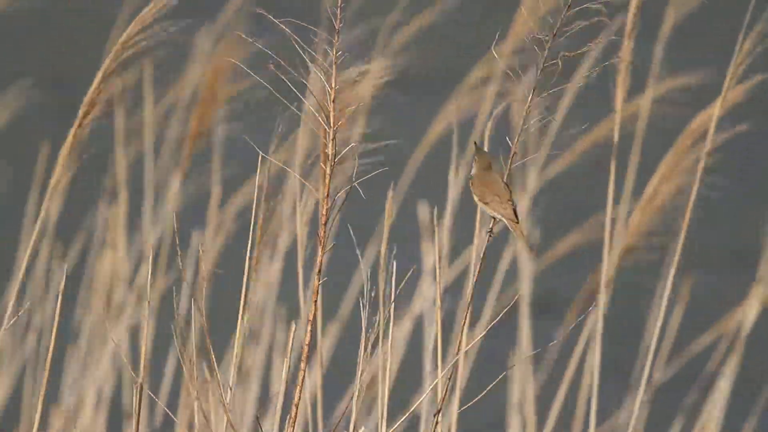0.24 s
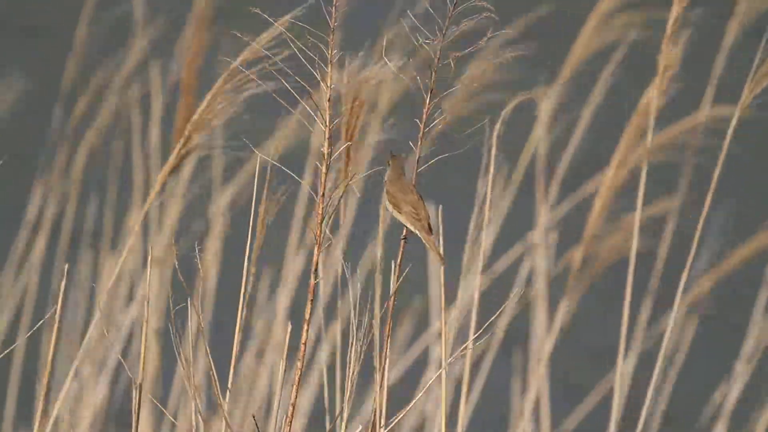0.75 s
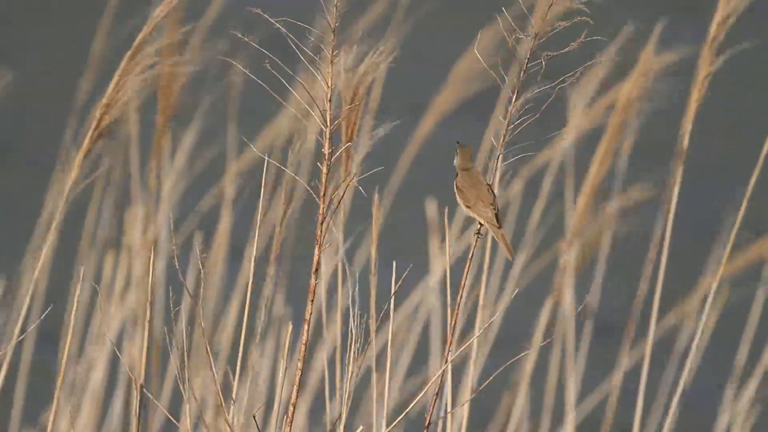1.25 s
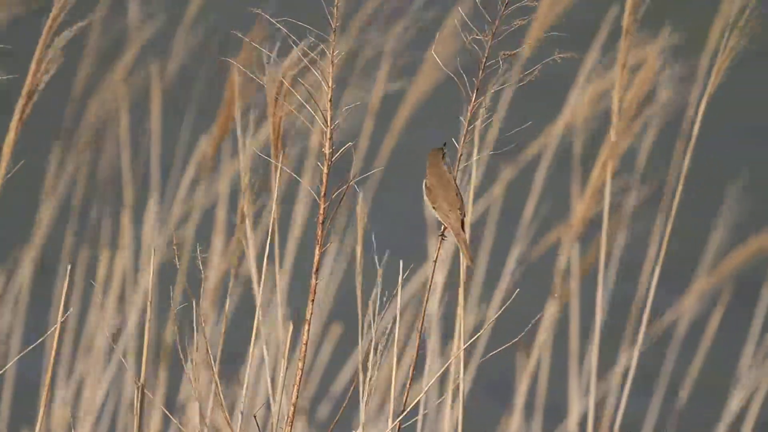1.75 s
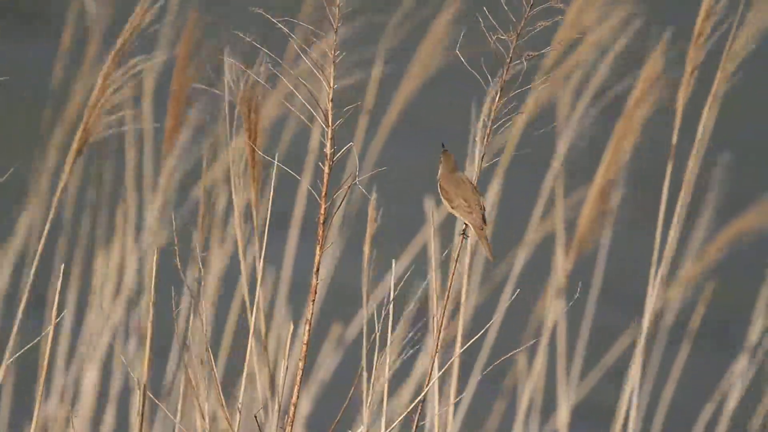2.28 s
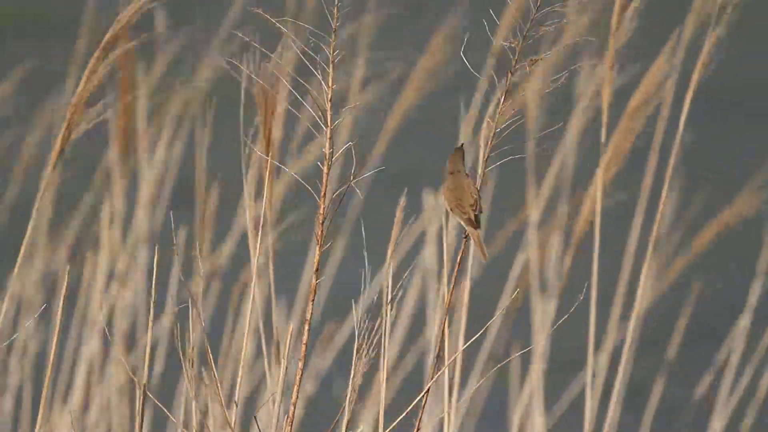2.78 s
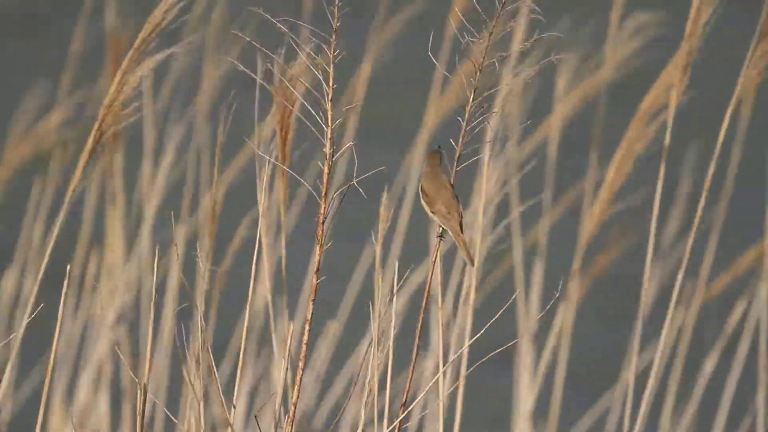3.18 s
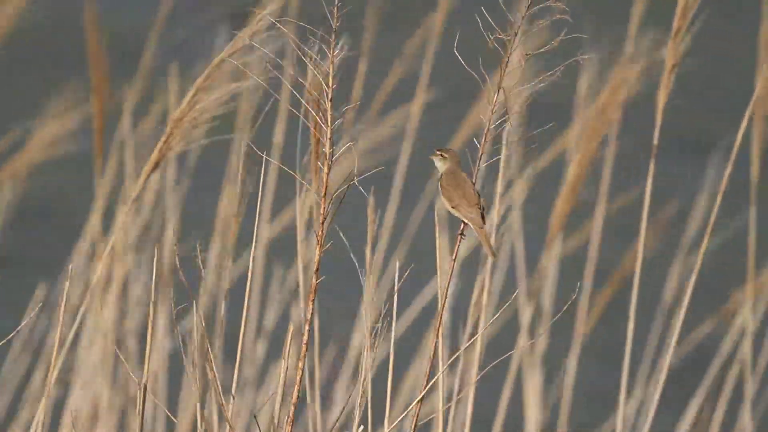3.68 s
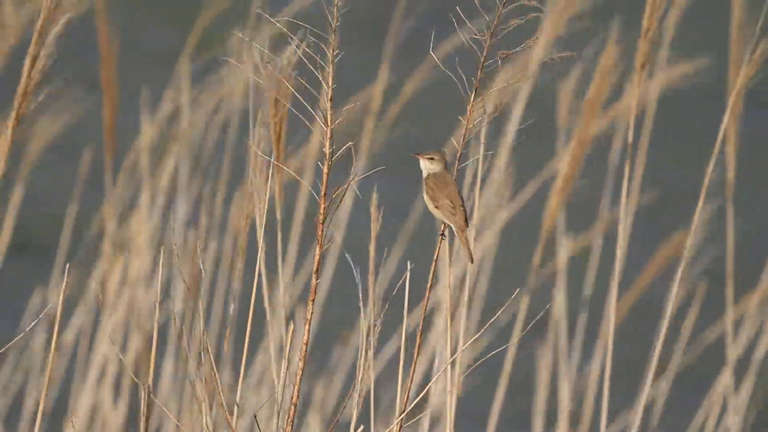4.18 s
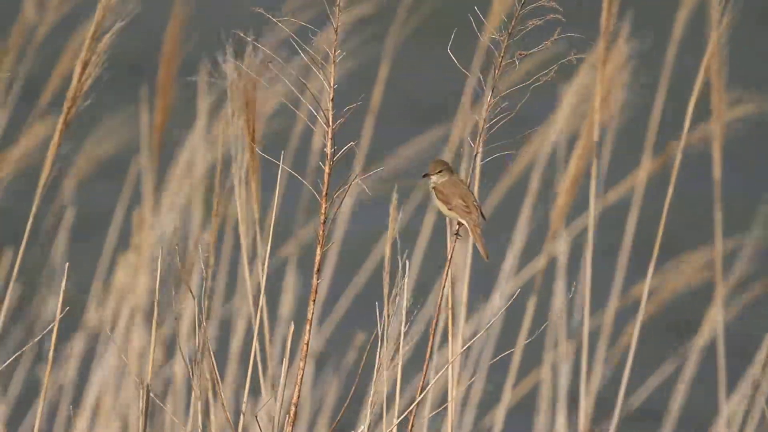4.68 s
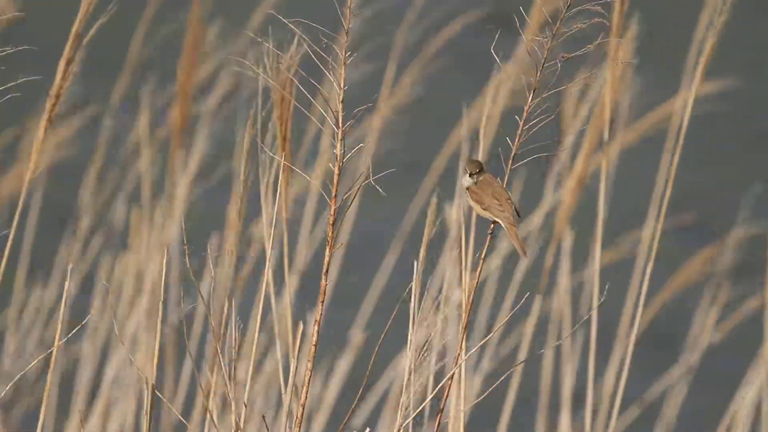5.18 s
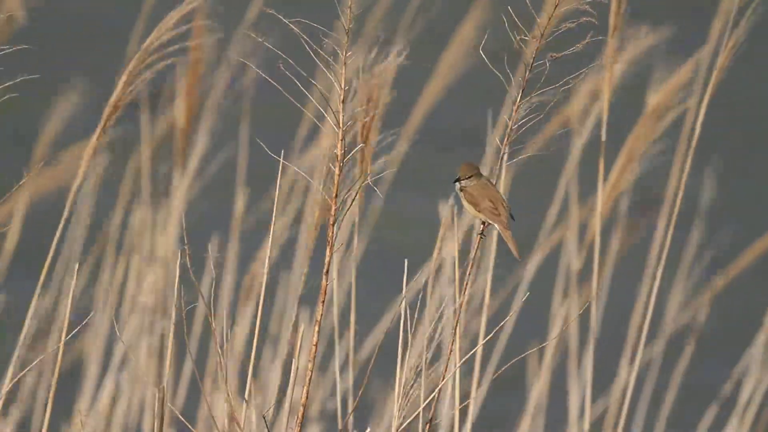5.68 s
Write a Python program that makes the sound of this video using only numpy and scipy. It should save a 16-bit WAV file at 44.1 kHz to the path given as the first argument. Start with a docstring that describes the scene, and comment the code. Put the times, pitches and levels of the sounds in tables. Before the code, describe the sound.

A reed warbler sings six quick phrases of dry rasps, thin chips and clicking creaks swelling into loud squeals, then fainter birds call across quiet reeds.

```python
"""A reed warbler sings six phrases from a reed stem: one or two rolled rasps, a warbled chip, then a creak that
swells into a two-voiced squeal. Membrane snaps excite resonances in the rasps and creaks; a frequency-modulated
tone makes the chips, and combination tones of two voices make the squeals. Reeds scatter the song and their far
edge echoes it. Other birds rasp, creak, squeal faintly, whistle and hoot further off; filtered noise makes a
stem's rustle, soft thumps at the microphone and quiet outdoor air with a low hum."""
import sys
import numpy as np
from scipy import signal
from scipy.fft import rfft, irfft, next_fast_len
from scipy.io import wavfile

SR = 44100
rng = np.random.default_rng(int(sys.argv[2]) if len(sys.argv) > 2 else 0)


def transcribe(signal):
    """Save signal, clipped to [-1, 1], as a 16-bit WAV file at the path in sys.argv[1]."""
    frames = np.atleast_2d(signal).T
    limited = np.clip(frames, -1, 1)
    pcm = np.round(limited * 32767).astype(np.int16)
    wavfile.write(sys.argv[1], SR, pcm)


N = 261954

# rolled rasps: roll_start_s, roll_length_s, level_db, throat_resonance_hz
RASPS = [(0.027, 0.048, -25.5, 2510), (0.543, 0.045, -24, 2580), (0.674, 0.047, -25, 2514),
         (1.225, 0.054, -24.5, 2470), (1.358, 0.05, -24, 2480), (1.985, 0.047, -23.5, 2500),
         (2.116, 0.048, -22.5, 2740), (2.729, 0.057, -24.5, 2640), (2.880, 0.051, -24.5, 2730),
         (3.521, 0.048, -24.5, 2640), (3.661, 0.057, -26, 2570)]
ROLL_HZ = 155.7  # mean beat rate of a rasp's roll
RASP_LEAD_S = 0.04  # a rasp's sound begins this long before its roll
# resonance of the beak on a rasp: frequency_hz, gain_db
RASP_BEAK = [(700, -13), (1400, -9), (1900, -2.5), (2400, 5.5), (3200, 0.5), (3700, -5), (4500, -10.5),
             (5600, -16), (7000, -13.5), (8500, -25), (10800, -14), (12400, -5), (15000, -37)]

# warbled chips: start_s, length_s, start_pitch_hz, end_pitch_hz, warble_depth_hz, warble_rate_hz, level_db
CHIPS = [(0.123, 0.046, 5560, 6300, 744, 134, -36), (0.776, 0.037, 7220, 5640, 560, 129, -38),
         (1.468, 0.04, 6240, 5770, 483, 140, -35.5), (2.217, 0.042, 6190, 5830, 576, 144, -38.5),
         (2.984, 0.0374, 5580, 5100, 850, 140, -31), (3.777, 0.046, 6100, 5690, 714, 120, -41)]
# resonance of the beak on a chip: frequency_hz, gain_db
CHIP_BEAK = [(4000, -22), (5050, -15.5), (5700, -4), (6230, -11), (7300, -13)]

# creaks: start_s, length_s, level_db, start_rate_clicks_per_s, run_on_level_db
CREAKS = [(.212, 0.034, -31.5, 440, -33), (.876, .043, -33.5, 320, -42), (1.57, 0.03, -34, 350, -35),
          (2.33, 0.031, -37.5, 260, -36), (3.092, .03, -35.5, 420, -40), (3.912, 0.037, -41, 240, -35.5)]
# resonance that the snaps of a creak excite: frequency_hz, gain_db
CREAK_RESONANCE = [(1200, -65), (2100, -19.5), (2850, -14), (3400, 2), (4090, -4.5), (5000, -4.5),
                   (5800, -18), (6780, -33), (8590, -37), (10300, -24.5), (14000, -49)]
CREAK_QUICKENS = 1.6  # click rate at the end over that at the start
# after a short catch every creak runs on, faster at its end, into its squeal
CATCH_S, RUN_ON_S, RUN_ON_RATES = 0.003, 0.032, (400, 650)  # rates in clicks a second

# squeals: start_s, length_s, peak_level_db, swell_up_to_peak_db, upper_voice_early_pitch_hz,
# upper_voice_late_pitch_hz, beat_with_lower_voice_hz, forced_last_stretch_s, hiss_relative_to_voice_db
SQUEALS = [(.263, 0.092, -15.5, 11.5, 2193, 2165, 356.5, 0.037, -26),
           (.934, 0.092, -18, 9, 2168, 2188, 331, 0.034, -23),
           (1.621, 0.093, -16, 10, 2245, 2110, 357.6, 0.033, -27),
           (2.384, 0.093, -17, 11, 2068, 2220, 300, 0.032, -22),
           (3.151, 0.095, -21, 8.5, 2146, 2145, 339.4, .039, -22),
           (3.964, 0.11, -19, 16.5, 2135, 2095, 388.5, 0.049, -17)]
# relative levels of the combination tones, a row for each multiple of the upper voice:
# one_beat_above_db, on_multiple_db, one_beat_below_db, two_beats_below_db and so on downwards
SQUEAL_TONES = [(-48, -25.5, -31.5), (-17, -0.5, -7, -3.5, -14.5, -28),
                (-42, -22.5, -33, -19, -26, -15.5, -32), (-48, -41, -42, -34, -42, -35.5, -38),
                (-44, -38, -29, -43, -41, -42), (-48, -46, -44, -41, -40, -35)]
# spectrum of a squeal's hiss: frequency_hz, gain_db
SQUEAL_HISS = [(1000, -36), (2400, -8), (3800, -6), (6000, 0.5), (7200, -18), (9000, -7),
               (10800, -9.5), (13000, -13), (15500, -40)]
SCOOP_HZ, SCOOP_S = 260.4, 0.011  # a squeal slides up into its pitch
FALL_HZ, FALL_S = 399, 0.02423  # and bends down at its end
FORCED_BEAT_HZ, FORCING_S = 266.4, 0.0066  # beat of the forced voices, time scale of the change
ATTACK_S, ATTACK_DB = 0.014, -17  # the onset starts this far below the start of the swell
HOLD_S, RELEASE_S, RELEASE_DB = 0.011, 0.012, -11.5  # the peak is held, then drops this far

# treble emphasis of scattering by nearby stems: frequency_hz, gain_db
STEM_SCATTER = [(1000, -4), (4000, 3.5), (6000, 4.5), (9000, 8), (12500, 15), (15500, 21)]
# echo from the far edge of the reed bed: delay, spread in time, level
BANK_S, BANK_SPREAD_S, BANK_DB = 0.275, 0.0097, -30.5

# a neighbour's rasps, all of one length and throat: roll_start_s, level_db
FAR_RASPS = [(3.391, -47.5), (4.245, -51), (4.605, -46), (4.72, -45.5), (4.842, -45), (5.634, -38),
             (5.762, -40.5), (5.889, -42)]
FAR_ROLL_S, FAR_THROAT_HZ = 0.048, 2390
# a neighbour's creaks: start_s, length_s, level_db
FAR_CREAKS = [(5.055, 0.025, -47.5), (5.07, 0.034, -41.5), (5.118, 0.037, -44.5), (5.254, .042, -42.5),
              (5.308, .037, -40)]
FAR_CREAK_RATES = (700, 950)  # clicks a second at the start and at the end
# further resonance of the neighbour's throat: frequency_hz, gain_db
FAR_CREAK_THROAT = [(2400, 4.5), (3000, 0), (3450, -3.5), (3850, -5), (4450, 5.5), (4850, 1),
                    (5300, 0), (7000, 7), (11000, 4)]
# other birds' whistles; the first two rows are the two thin upper tones of a neighbour's faint squeal: start_s,
# length_s, start_pitch_hz, middle_pitch_hz, end_pitch_hz, vibrato_depth_fraction_of_pitch, level_db
WHISTLES = [(3.808, 0.096, 4170, 4220, 4050, 0.03, -49.5), (3.839, 0.12, 3660, 3640, 3630, 0.03, -47.5),
            (4.11, .06, 2707, 2804, 2820, 0, -46.5), (4.143, .093, 2790, 2917, 2970, 0, -36),
            (4.368, 0.13, 2620, 2880, 2880, 0, -48.5), (4.625, .08, 4850, 4350, 3120, 0.02, -55),
            (4.753, .045, 3260, 3630, 3350, 0.04, -54.5), (4.805, .025, 4070, 3930, 3700, .01, -59),
            (4.832, .11, 4500, 4760, 4780, .015, -57), (4.95, .04, 5130, 5300, 5340, 0.05, -53.5),
            (5.128, .048, 7450, 6600, 5150, .015, -56), (5.172, .026, 5200, 5450, 5700, 0.04, -52.5),
            (5.394, .11, 3210, 3090, 2940, 0.04, -45), (5.498, 0.059, 2690, 2830, 2530, .015, -48.5)]
# distant hoots: start_s, length_s, start_pitch_hz, level_db, octave_relative_to_fundamental_db
HOOTS = [(0.806, 0.087, 690, -52, -21), (4.602, .1, 712, -59.5, -18), (5.19, .16, 753, -55, -4),
         (5.365, 0.21, 720, -55.5, -12)]
HOOT_SAG_HZ_PER_S = 225

# dry rustles: start_s, decay_s, onset_level_db
RUSTLES = [(0.394, 0.036, -46), (0.427, 0.026, -41), (0.457, 0.018, -43.5)]
# spectrum of a rustle: frequency_hz, gain_db
LEAF_NOISE = [(1000, -18), (4500, 0.5), (8000, -5), (13000, -1), (15500, -14.5)]
# soft thumps: start_s, pitch_hz, decay_s, level_before_decay_db
THUMPS = [(5.147, 42, 0.041, -41.5), (5.207, 74.8, 0.049, -36), (5.253, 57.4, 0.061, -40.5),
          (5.307, 62.6, 0.028, -39), (5.386, 78.5, 0.03, -39.5), (5.565, 69, 0.034, -39.5)]
# spectrum of the noise in a thump: frequency_hz, gain_db
THUMP_RUMBLE = [(20, -4), (60, 2), (150, -6), (300, -27), (1000, -41), (4000, -82)]

# spectrum of the outdoor air: frequency_hz, gain_db
AIR_SPECTRUM = [(20, -9), (45, -1.5), (90, -2), (150, 2), (220, -1.5), (320, 0.5), (540, -6.5), (750, -2.5),
                (1300, -3.5), (2200, -6.5), (3200, -8), (4200, -8.5), (5500, -14), (11000, -18.5),
                (15500, -24)]
AIR_DB, MURMUR_DB = -48.5, -65.5
# spectrum of a faint narrow-band murmur: frequency_hz, gain_db
MURMUR_SPECTRUM = [(150, -22), (350, -25), (420, 9), (500, -22), (1000, -47), (3000, -84)]
# the single swell of a distant hum: start_s, rise_s, hold_s, fade_s
HUM_SWELL_S = (1.5, .2, .35, .7)
HUM_DB, HUM_SWELL_DB = -66, 10.5
TOP_HZ = 15800  # upper band limit of the recorder


def undb(db):
    """Decibels are logarithmic: twenty to each factor of ten in amplitude."""
    return 10 ** (np.asarray(db) / 20)


def unit(x):
    """Normalisation: division by the rms amplitude gives unit mean power."""
    return x / np.sqrt(np.mean(x ** 2) + 1e-20)


def clock(length):
    """Uniform sampling: times in seconds from zero to length."""
    return np.arange(int(length * SR)) / SR


def turn(hz):
    """Phase is the time integral of angular frequency."""
    return 2 * np.pi * np.cumsum(hz) / SR


def add(out, start, x):
    """Superposition: x is summed into out from the start time in seconds."""
    i = int(start * SR)
    x, i = x[max(-i, 0):], max(i, 0)
    out[i:i + len(x)] += x[:max(len(out) - i, 0)]


def wander(n, rate):
    """Band-limited chance: straight lines join random values, drawn rate times a second, to spread near 1."""
    steps = np.arange(n) * rate / SR
    return 1.2 * np.interp(steps, np.arange(1024), rng.standard_normal(1024))


def colour(x, points):
    """Minimum-phase filtering: a folded cepstrum makes the (Hz, dB) response causal."""
    hz, db = np.transpose(points)
    n = next_fast_len(len(x) + 2048) * 2
    bins_hz = np.arange(n // 2 + 1) * SR / n
    gain = undb(np.interp(np.log(bins_hz + 1), np.log(hz), db))
    cepstrum = irfft(np.log(gain))
    cepstrum[1:n // 2] *= 2
    cepstrum[n // 2 + 1:] = 0
    response = np.exp(rfft(cepstrum))
    return irfft(rfft(x, n) * response)[:len(x)]


def warbler():
    """Superposed rasps, chips, creaks and squeals; the higher notes scatter more among the stems."""
    low, high = np.zeros((2, N))
    for start, length, db, throat_hz in RASPS:
        add(low, start - RASP_LEAD_S, undb(db) * rasp(length, throat_hz))
    for start, length, *shape, db in CHIPS:
        add(high, start, undb(db) * chip(length, *shape))
    for start, length, db, rate, run_on_db in CREAKS:
        add(high, start, undb(db) * creak(length, rate, rate * CREAK_QUICKENS))
        add(high, start + length + CATCH_S, undb(run_on_db) * creak(RUN_ON_S, *RUN_ON_RATES))
    for start, length, *gesture, hiss_db in SQUEALS:
        add(high, start, squeal(length, gesture, hiss_db))
    near_low = reeds(low, early_db=-20, late_db=-26)
    near_high = reeds(high, early_db=-16.5, late_db=-32)
    return near_low + near_high + far_bank(low + high)


def clicks(rate, jitter, scatter_db):
    """Impulsive excitation: uneven snaps of the syrinx membranes at a moving rate."""
    chance = rng.standard_normal((256, 2))
    due = np.cumsum(np.exp(jitter * chance[:, 0]))
    at = np.searchsorted(np.cumsum(rate) / SR, due - due[0])
    keep = at < len(rate)
    return np.bincount(at[keep], undb(scatter_db * chance[keep, 1]), len(rate))


def rasp(length, throat_hz, gap=0.011, roll_depth=0.81, release=0.0036, ring_s=0.0005, wobble=0.11):
    """Damped resonance: snaps in a swelling scrape, then a roll, ring a throat whose tuning wobbles."""
    t = clock(RASP_LEAD_S + length + 0.03) - RASP_LEAD_S  # zero where the roll begins
    since_crest = t + gap + 0.0037
    rise = np.minimum(since_crest + 0.0026, 0) / 0.011
    fall = np.maximum(since_crest, 0) / 0.0037
    scrape = 1.3 * np.exp(rise - fall)

    # each beat of the roll opens at once and closes gradually; the last beats run together
    beat_phase = (np.maximum(t, 0) * ROLL_HZ * (1 + 0.034 * rng.standard_normal())) % 1
    closure = np.clip(2.74 * beat_phase - 1.2, 0, 1)
    separation = np.clip(2.2 - 2 * t / length, 0, 1)
    flutter = 1 - min(roll_depth, 1) * separation * closure
    roll = 1.31 * (t > 0) * flutter * np.exp(-np.maximum(t - length + 0.0057, 0) / release)

    # the snaps start afresh with the roll
    parts = [np.full(np.sum(part), 620.0) for part in (t <= 0, t > 0)]
    snaps = np.concatenate([clicks(rate, jitter=0.17, scatter_db=0.2) for rate in parts])
    # in a frame rotating at the throat's frequency, ringing is a plain decay
    tuning = np.exp(1j * turn(throat_hz * (1 + wobble * wander(len(t), 327.1))))
    decay = np.exp(-1 / (ring_s * SR))
    ring = np.real(tuning * signal.lfilter([1], [1, -decay], snaps * (scrape + roll) / tuning))
    voice = colour(ring, RASP_BEAK)
    return voice / np.sqrt(np.sum(voice ** 2) / SR / (length + gap))


def chip(length, start_hz, end_hz, depth_hz, rate, overtone_db=-29):
    """Frequency modulation: a round-topped, sharp-dipped warble sweeps a tone through the beak's resonance."""
    t = clock(length)
    cycle = 2 * np.pi * rate * t
    warble = depth_hz * (np.sin(cycle) + 0.14 * np.cos(2 * cycle))
    warble *= 0.95 + 0.38 * wander(len(t), 127)
    hz = np.linspace(start_hz, end_hz, len(t)) + warble + 110 * wander(len(t), 309)
    beak = undb(np.interp(hz, *np.transpose(CHIP_BEAK)))
    swell = np.interp(t / length, [0, 0.4, 0.88, 1], [0.28, 1, 0.74, 0.097])
    phase = turn(hz)
    return unit(swell * (beak * np.sin(phase) + undb(overtone_db) * np.sin(2 * phase)))


def creak(length, start_rate, end_rate):
    """Impulse train through a resonance: separate snaps that quicken and grow."""
    n = int(length * SR)
    snaps = clicks(np.linspace(start_rate, end_rate, n), jitter=0.15, scatter_db=2.1)
    snaps = snaps * np.linspace(0.65, 1, n)
    return unit(colour(np.pad(snaps, (0, 128)), CREAK_RESONANCE))


def squeal(length, gesture, hiss_db, sweep=0.906, drift_hz=12):
    """Intermodulation: both sides of the syrinx sound together; the tones break up as the note is forced."""
    t = clock(length)
    n = len(t)
    pitch, beat, db = squeal_gesture(t, length, *gesture)
    strain = 0.12 + 0.6 * np.linspace(0, 1, n) ** 4
    upper = turn(pitch + 7 * wander(n, 244) + drift_hz * wander(n, 70.4))
    beats = turn(beat) + 0.8 * strain * wander(n, 300)
    voice = 0
    for multiple, tones in enumerate(SQUEAL_TONES, 1):
        for below, tone_db in enumerate(tones, -1):
            # the lag between neighbouring tones makes every beat a small upward sweep
            lag = sweep * below ** 2
            breakup = multiple / 2 * strain * wander(n, 500)
            phase = multiple * upper - below * beats - lag + breakup
            voice = voice + undb(tone_db) * np.sin(phase)
    hiss = colour(rng.standard_normal(n), SQUEAL_HISS)
    edges = np.clip(np.minimum(t, length - t) / 0.0055, 0, 1)
    return (unit(voice) + undb(hiss_db) * unit(hiss)) * undb(db) * edges


def squeal_gesture(t, length, peak_db, swell_db, early_hz, late_hz, beat_hz, forced_s):
    """Glide and swell: the pitch scoops up and finally falls; forcing shifts the beat as the level peaks."""
    left = length - t
    scoop = SCOOP_HZ * np.exp(-t / SCOOP_S)
    fall = FALL_HZ * np.maximum(1 - left / FALL_S, 0) ** 2
    pitch = early_hz + (late_hz - early_hz) * t / length - scoop - fall
    forced = 0.5 + 0.5 * np.tanh((forced_s - left) / FORCING_S)
    beat = beat_hz + (FORCED_BEAT_HZ - beat_hz) * forced
    release_at = length - RELEASE_S
    times = [0, ATTACK_S, release_at - HOLD_S, release_at, length]
    db = peak_db + np.interp(t, times, [ATTACK_DB - swell_db, -swell_db, 0, 0, RELEASE_DB])
    return pitch, beat, db


def reeds(x, early_db, late_db, early_s=0.021, late_s=0.13, slap_s=0.0328, slap_db=-5):
    """Scattering: near stems favour the treble, a denser stand throws sound back, the wide bed adds a tail."""
    t = clock(0.8)
    near, wide, stand = rng.standard_normal((3, len(t)))
    early = unit(near * np.exp(-t / early_s) * np.clip((t - 0.004) / 0.0051, 0, 1))
    slap = unit(stand * np.exp(-((t - slap_s) / 0.0016) ** 2))
    early = colour(early + undb(slap_db) * slap, STEM_SCATTER)
    late = unit(wide * np.exp(-t / late_s) * np.clip(t / 0.048, 0, 1))
    echo = (undb(early_db) * early + undb(late_db) * late) / np.sqrt(len(t))
    return x + signal.fftconvolve(x, echo)[:N]


def far_bank(x):
    """Delayed diffuse reflection: a short noise burst as impulse response gives one faint, blurred echo."""
    t = clock(0.5)
    spread = np.exp(-((t - BANK_S) / BANK_SPREAD_S) ** 2)
    blur = unit(rng.standard_normal(len(t)) * spread) / np.sqrt(len(t))
    return undb(BANK_DB) * signal.fftconvolve(x, blur)[:N]


def neighbours():
    """Reverberant distance: birds deeper in the reed bed have more echo."""
    out = np.zeros(N)
    for start, db in FAR_RASPS:
        add(out, start - RASP_LEAD_S, undb(db) * rasp(FAR_ROLL_S, FAR_THROAT_HZ))
    for start, length, db in FAR_CREAKS:
        voice = colour(creak(length, *FAR_CREAK_RATES), FAR_CREAK_THROAT)
        add(out, start, undb(db) * unit(voice * np.sqrt(np.hanning(len(voice)))))
    for start, length, start_hz, middle_hz, end_hz, buzz, db in WHISTLES:
        add(out, start, undb(db) * whistle(length, start_hz, middle_hz, end_hz, buzz=buzz))
    for start, length, hz, db, octave_db in HOOTS:
        add(out, start, undb(db) * hoot(length, hz, octave_db))
    return reeds(out, early_db=-14, late_db=-21)


def whistle(length, start_hz, middle_hz, end_hz, waver=0.0035, buzz=0):
    """Nearly sinusoidal tone: a parabola bends it through three pitches; a fast vibrato can make it buzz."""
    t = clock(length)
    bend = np.polyfit([0, length / 2, length], [start_hz, middle_hz, end_hz], 2)
    hz = np.polyval(bend, t)
    vibrato = waver * wander(len(t), 217) + buzz * np.sin(turn(135 + 15 * wander(len(t), 110)))
    swell = np.interp(t / length, [0, 0.15, 0.8, 1], [0.21, 0.7, 0.9, 0.047])
    swell = swell * undb(2.1 * wander(len(t), 69))
    throb = 1 + min(12 * buzz, 0.9) * np.sin(2 * np.pi * 48 * t)  # buzzy notes also pulse
    return unit(swell * throb * np.sin(turn(hz * (1 + vibrato))))


def hoot(length, start_hz, octave_db):
    """Fundamental and octave: two whistled tones sag in pitch together."""
    glide = start_hz - HOOT_SAG_HZ_PER_S * length * np.array([0, 0.5, 1])
    return whistle(length, *glide) + undb(octave_db) * whistle(length, *(2 * glide))


def rustles():
    """Friction noise: dry leaves brush together in decaying bursts."""
    out, t = np.zeros(N), clock(0.25)
    for start, decay, db in RUSTLES:
        leaf = unit(colour(rng.standard_normal(len(t)), LEAF_NOISE))
        add(out, start, undb(db) * leaf * np.exp(-t / decay))
    return out


def thumps():
    """Damped low oscillation with rumbling noise: dull bumps shake the microphone."""
    out, t = np.zeros(N), clock(0.25)
    for start, hz, decay, db in THUMPS:
        rumble = unit(colour(rng.standard_normal(len(t)), THUMP_RUMBLE))
        body = np.sin(2 * np.pi * hz * t) + 0.56 * rumble
        add(out, start, undb(db) * body * np.exp(-t / decay) * np.minimum(t / 0.004, 1))
    return out


def air(sway_db=0.5, hum_hz=58):
    """Filtered random noise: a slightly swaying outdoor wash, a faint murmur and a low hum far away."""
    wash = unit(colour(rng.standard_normal(N), AIR_SPECTRUM)) * undb(AIR_DB + sway_db * wander(N, 5.06))
    murmur = undb(MURMUR_DB) * unit(colour(rng.standard_normal(N), MURMUR_SPECTRUM))
    hum_swell = np.interp(np.arange(N) / SR, np.cumsum(HUM_SWELL_S), [0, 1, 1, 0])
    hum_db = HUM_DB + HUM_SWELL_DB * hum_swell + 2.8 * wander(N, 9)
    hum = unit(np.sin(turn(hum_hz + 1.39 * wander(N, 9.2)))) * undb(hum_db)
    return wash + murmur + hum


def scene():
    """Superposition of all sound pressures at one microphone."""
    return (warbler() + neighbours() + rustles() + thumps() + air())[None]


def record(dry):
    """Band limitation: the recorder cuts the top with a steep zero-phase low-pass."""
    low_pass = signal.ellip(10, 0.05, 60, TOP_HZ, fs=SR, output="sos")
    return signal.sosfiltfilt(low_pass, dry)


dry = scene()
out = record(dry)
transcribe(out)
```